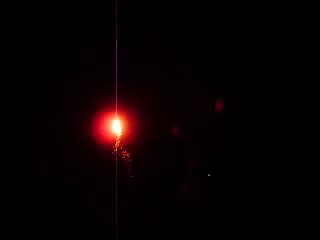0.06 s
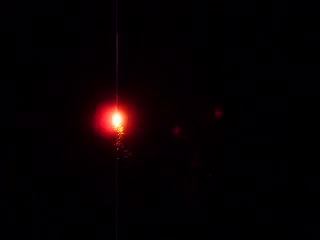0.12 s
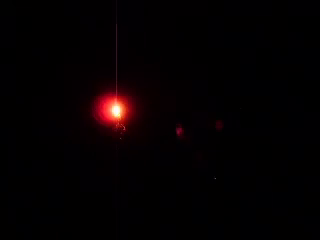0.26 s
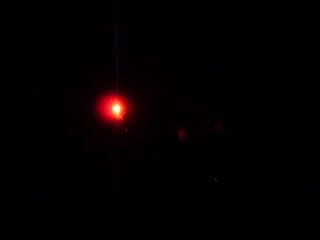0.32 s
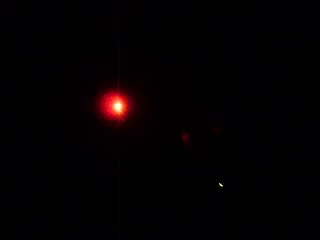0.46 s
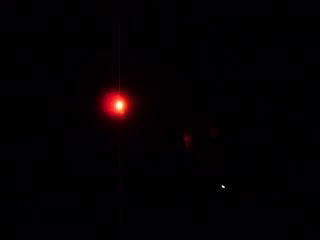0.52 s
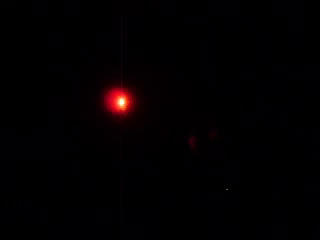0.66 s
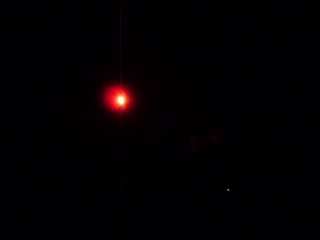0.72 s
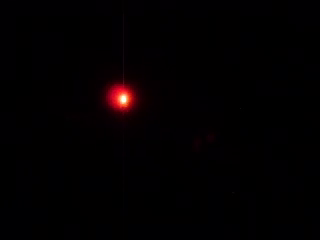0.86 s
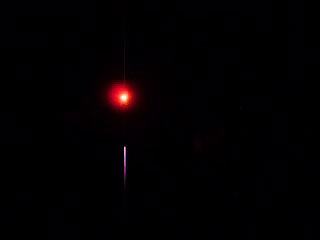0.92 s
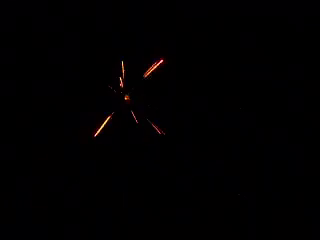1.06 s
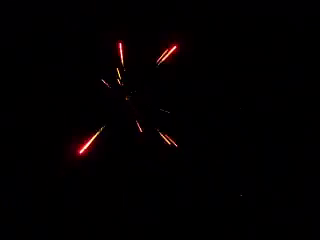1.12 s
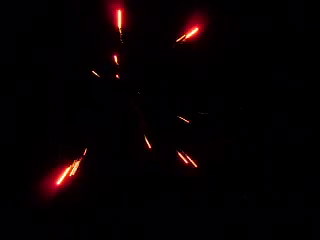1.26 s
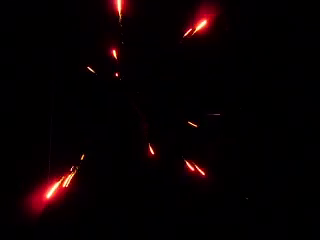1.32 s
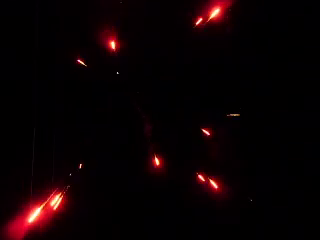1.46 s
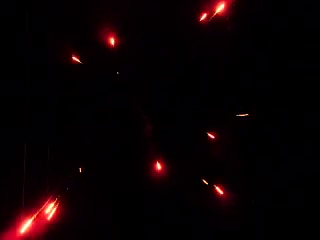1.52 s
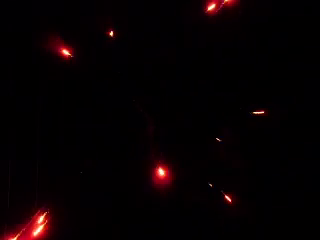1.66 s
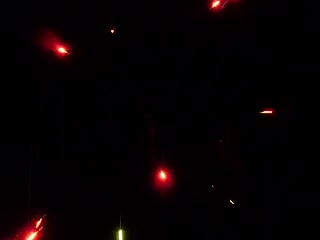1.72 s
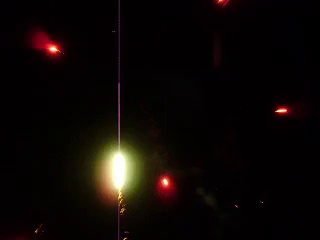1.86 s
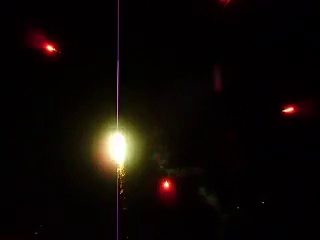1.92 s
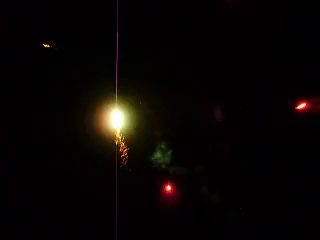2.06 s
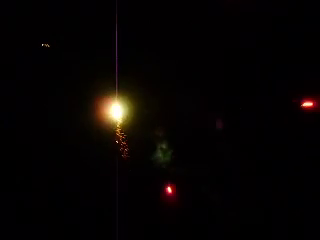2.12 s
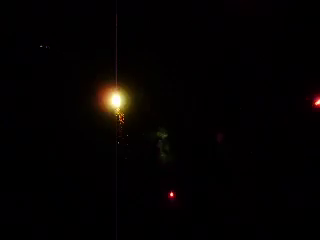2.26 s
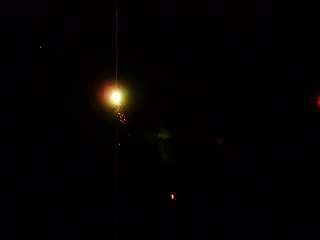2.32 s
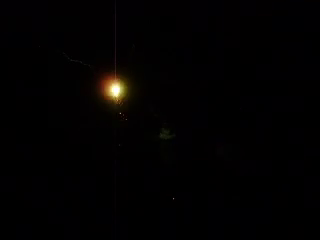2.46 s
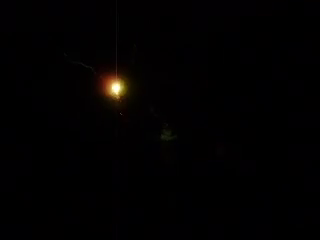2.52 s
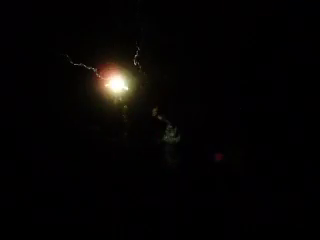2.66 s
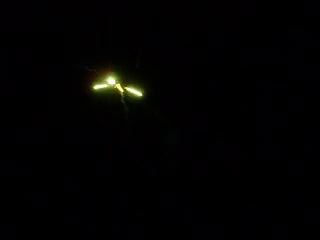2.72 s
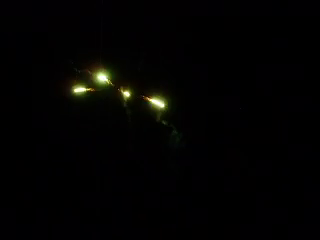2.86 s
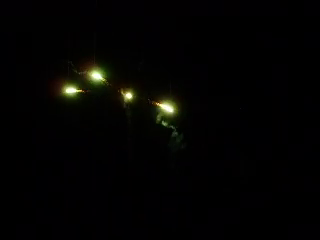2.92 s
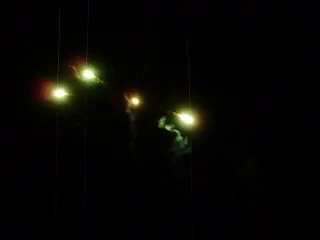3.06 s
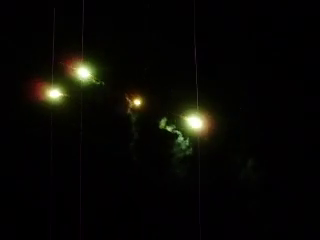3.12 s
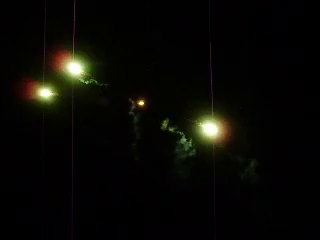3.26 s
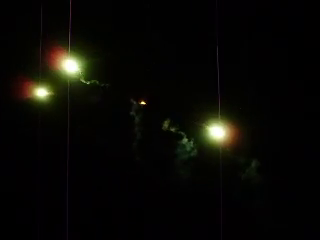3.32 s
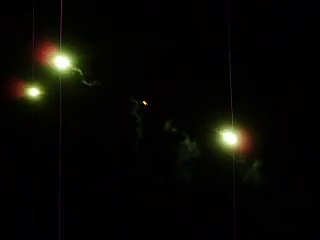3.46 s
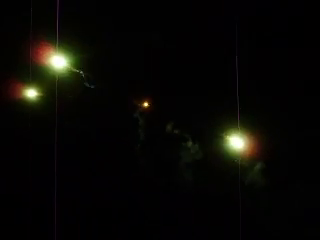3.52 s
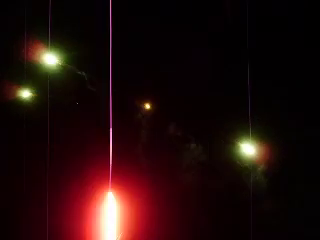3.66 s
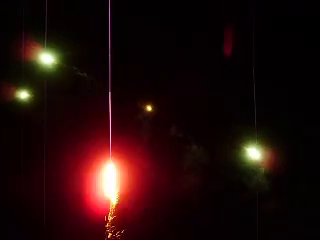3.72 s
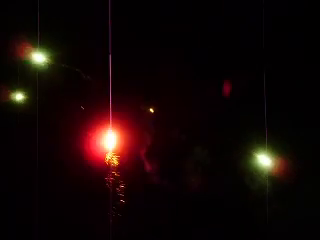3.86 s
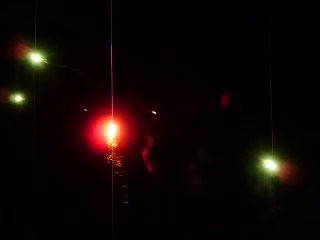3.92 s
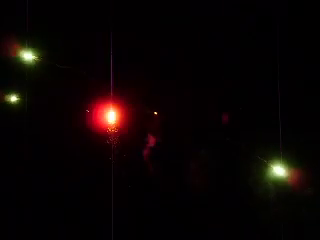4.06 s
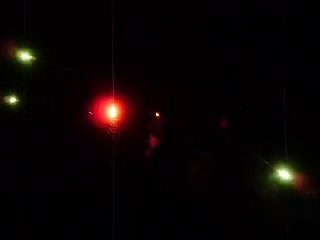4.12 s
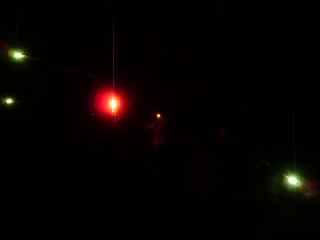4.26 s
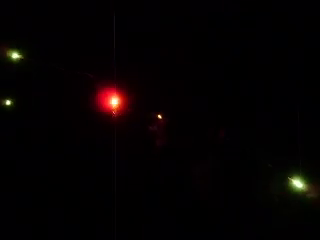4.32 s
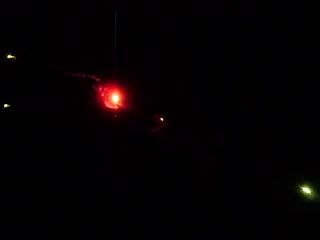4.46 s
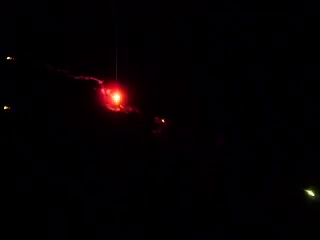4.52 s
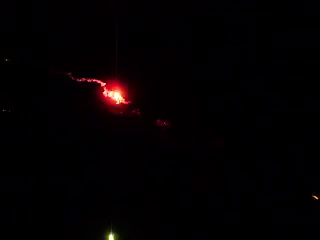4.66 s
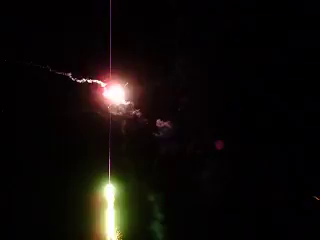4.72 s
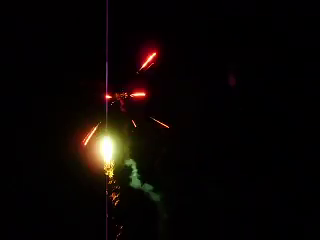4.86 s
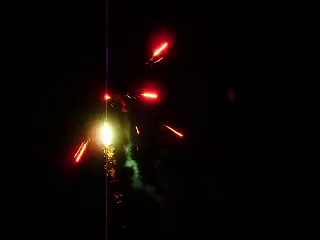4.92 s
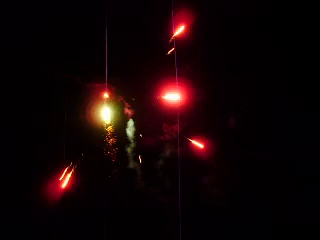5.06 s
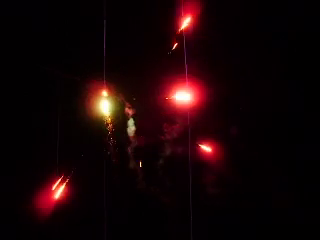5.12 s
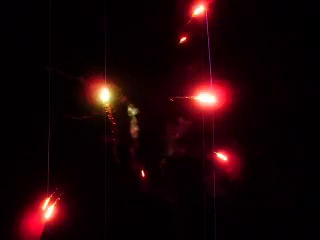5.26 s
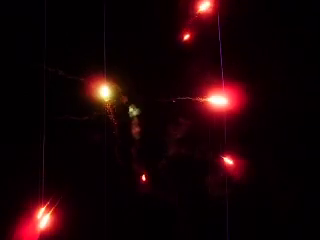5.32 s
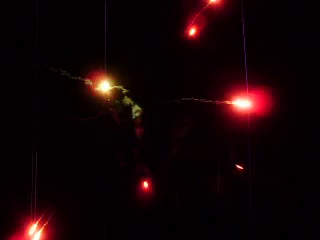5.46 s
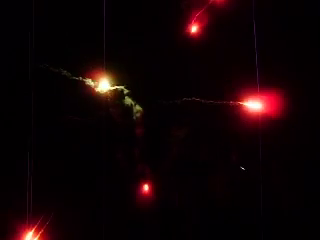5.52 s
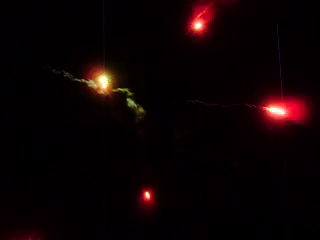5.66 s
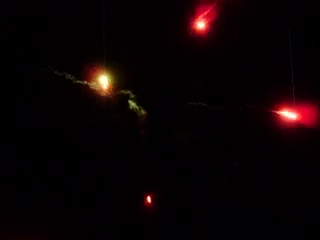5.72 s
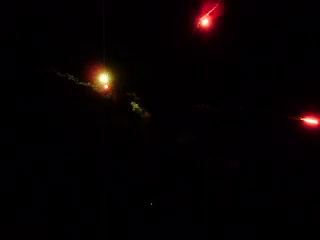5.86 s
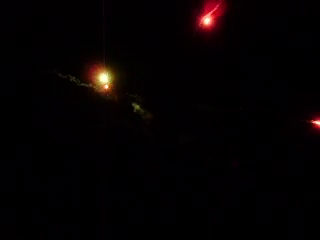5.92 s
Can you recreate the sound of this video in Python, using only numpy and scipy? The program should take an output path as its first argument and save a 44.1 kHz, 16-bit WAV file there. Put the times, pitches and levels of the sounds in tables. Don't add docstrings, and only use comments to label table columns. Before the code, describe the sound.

A night firework battery outdoors, heard through a small, band-limited microphone that overloads on every blast. It opens with low wind buffeting and a dying rush of far echoes, fading to near quiet by 1 s. A faint report at 1.1 s precedes a hard overhead burst at 1.2 s, with a sharp far report at 1.4 s and a long rough rush of echoes. A ground lift charge thuds at 1.7 s, slightly weaker, with rapid wall slaps. The second burst comes at 2.9 s, a strong report close behind at 3.0 s, then a brief falling chirp of fence reflections lies within its echoes. Full lift thuds hit at 3.5 and 4.6 s, and the third burst at 4.95 s, its rush lasting longest. Small reports dot the gaps, including 2.1, 4.4, 5.25 and 5.8 s. Low wind gusts swell throughout, strongest at 5.3 s, as echoes continue to the end.

```python
import sys
import numpy as np
from scipy import signal
from scipy.fft import rfft, irfft
from scipy.io import wavfile
from scipy.ndimage import uniform_filter1d

SR = 44100
rng = np.random.default_rng(int(sys.argv[2]) if len(sys.argv) > 2 else 0)


def elevation(decibels):
    levels = np.asarray(decibels, float)
    return 10 ** (levels / 20)


def digitize_waveform(pressure):
    field = np.atleast_2d(pressure).T
    bounded = np.clip(field, -1, 1)
    quanta = np.round(bounded * 32767).astype(np.int16)
    wavfile.write(sys.argv[1], SR, quanta)


N = 263718


def evened(x):
    return x / np.sqrt(np.mean(x ** 2) + 1e-20)


def add(mix, start_s, sound):
    part = mix[round(start_s * SR):][:len(sound)]
    part += sound[:len(part)]


def coloured(x, colour):
    hz = np.fft.rfftfreq(len(x), 1 / SR) + 1
    colour_hz, colour_db = np.transpose(colour)
    return hz, rfft(x) * elevation(np.interp(np.log(hz), np.log(colour_hz), colour_db))


def low_pass(x, hz, count):
    taps = signal.firwin(count, hz, window=("kaiser", 9), fs=SR)
    return signal.oaconvolve(x, taps[None], "same")


def blast(ms):
    u = np.arange(2000) / SR / (ms / 1000)
    return (1 - u) * np.exp(-u)


def scatter(size, per_s, spread_db):
    chance, rarity, sign = rng.random((size, 3)).T
    strength = elevation(spread_db * np.minimum(-np.log(rarity + 1e-9), 3))
    return (chance < per_s / SR) * strength * np.sign(sign - .5)


SPLIT_HZ = (260, 1150)


def echoes(taps, colour, gains):
    hz, spectrum = coloured(taps, colour)
    low, high = (1 / (1 + (hz / edge_hz) ** 6) for edge_hz in SPLIT_HZ)
    bands = (np.sqrt(low), np.sqrt(high - low), np.sqrt(1 - high))
    return sum(evened(irfft(spectrum * b, len(taps))) * g for b, g in zip(bands, gains))


# middle in seconds, level in dB, half length in seconds.
GUSTS = [
    (.12, -35.5, 0.3),
    (1.5, -33, 0.2),
    (2.5, -36.5, 0.14),
    (3.1, -38.5, 0.2),
    (4.1, -38.5, 0.68),
    (5.29, -23, 0.071),
    (5.504, -28, 0.14),
    (5.9, -32.5, .1),
]
# frequency in Hz, density in dB per Hz.
GUST_COLOUR = [(12, -32), (20, -6), (49, -6), (86, -1.5), (157, -4), (198, -7), (250, -32), (320, -44.5),
               (550, -120)]


def wind():
    calm_db, shake_db, shake_s = -50, -35.5, 0.21
    t = np.arange(N) / SR
    gusts = sum(elevation(db) ** 2 * np.exp(-((t - s) / half_s) ** 2) for s, db, half_s in GUSTS)
    since = [np.maximum(t - s, 0) / shake_s for s, _ in LIFTS]
    shakes = sum((elevation(shake_db) * u * np.exp(1 - u)) ** 2 for u in since)
    lumps = evened(uniform_filter1d(rng.standard_normal(N), 3000))
    rumble = evened(irfft(coloured(rng.standard_normal(N), GUST_COLOUR)[1], N))
    return rumble * np.sqrt(elevation(calm_db) ** 2 + gusts + shakes) * elevation(0.73 * lumps)


# start in seconds, level in dB, brightness in dB, hold in seconds, fade in dB/s.
RUSHES = [(-.02, -30, 3, 0.013, 65), (0.048, -25.5, -10.5, 0.62, 19), (0.259, -49, -1, 0.023, 67),
          (1.33, -20.5, 2, 0.44, 35), (1.956, -25, -1.5, 0.089, 27), (2.144, -22.5, -5.5, 0.077, 2),
          (3.008, -18.5, -4, 0.075, 38), (3.185, -22, -6, 0.088, 5), (3.795, -28.5, -1, 0.21, 36),
          (4.878, -33.5, 4.5, .05, 19.5), (5.054, -20.5, 2.5, 0.96, 8), (5.73, -27, -6, 0.084, 27.5),
          (5.879, -22, -6.5, 0.032, 39)]


def rush_strength():
    rise_s, boom_db = 0.0067, -28
    night_db, fade_share, air_db_per_s = (-55.5, -39.5, -50.5), (0.88, 0.88, 0.74), (19.5, 4, 15)
    t = np.arange(N) / SR
    power = elevation(np.array(night_db))[:, None] ** 2
    for s, db, bright_db, hold_s, fade in RUSHES:
        since = np.maximum(t - s, 0)
        faded_db = np.outer(fade_share, fade * np.maximum(since - hold_s, 0))
        worn_db = faded_db + np.outer(air_db_per_s, since)
        start_db = db + np.array([boom_db, 0, bright_db])
        rise = np.minimum(since / rise_s, 1)
        power = power + (t > s) * rise * elevation(start_db[:, None] - worn_db) ** 2
    return np.sqrt(power)


# frequency in Hz, density in dB per Hz.
RUSH_COLOURS = [
    [(59, -18.5), (100, -2), (187, -19.5), (263, -6.5), (690, -8.5), (1250, -23.5), (1400, -23),
     (2350, -17.5), (3900, -28), (5070, -61), (8580, -120)],
    [(59, -40.5), (100, -16), (193, -4.5), (403, 2), (734, -0.5), (1310, -16), (2910, -13), (3560, -21),
     (3900, -18), (5070, -64), (8580, -120)],
    [(59, -25), (100, -17.5), (219, -12), (341, -7.5), (391, -5.5), (982, -5.5), (1310, -14), (3010, -6),
     (3900, -14.5), (5070, -50), (8580, -120)],
    [(59, -35.5), (100, -3.5), (341, -1.5), (478, 2), (679, 1.5), (1240, -16), (2780, -15), (3560, -21.5),
     (3900, -21), (5070, -49.5), (8580, -120)],
]


def rush():
    clumps = elevation(1.5 * evened(uniform_filter1d(rng.standard_normal(N), 800)))
    taps = scatter(N, 9000, 2.1) * clumps
    gains = rush_strength()
    last_burst = np.searchsorted([b[0] for b in BURSTS], np.arange(N) / SR)
    return np.choose(last_burst, [echoes(taps, colour, gains) for colour in RUSH_COLOURS])


# start in seconds, peak in dB, length
# in ms.
THUDS = [(1.103, -16, .45), (1.388, 4.5, .3), (1.518, -9, .4), (2.142, -10, .5), (2.775, -14, .5),
         (3.026, .7, .25), (3.045, -6, .4), (3.192, -9, .2), (4.401, -13, 2.2), (5.255, -7.5, .5),
         (5.765, -7.5, .5), (5.809, -9.5, .5)]


def thuds():
    out = np.zeros(N)
    for s, db, ms in THUDS:
        hold = np.exp(-1000 / (.3 * ms * SR))
        dulled = signal.lfilter([(1 - hold) ** 2], [1, -2 * hold, hold ** 2], blast(ms))
        add(out, s, -elevation(db) * dulled / dulled.max())
    return out


def answer(groups, bands_db, release_db_per_s):
    t, power = np.arange(SR // 2) / SR, 0
    for s, length_s, db, fade, bright_db in groups:
        db_t = db - fade * np.clip(t - s, 0, length_s)
        db_t = db_t - release_db_per_s * np.maximum(t - s - length_s, 0)
        tilt_db = np.array(bands_db) + bright_db * np.array([-1, 0, 1])
        power = power + (t >= s) * elevation(db_t + tilt_db[:, None]) ** 2
    return np.sqrt(power)


def volley(shots, colours, gains, sound_back, alike, clump_db):
    size, out = SR // 2, np.zeros(N)
    shared = scatter(size, 5000, 3.6)
    clumps = elevation(clump_db * evened(uniform_filter1d(rng.standard_normal(size), 350)))
    for (s, db, *more), colour in zip(shots, colours):
        own = scatter(size, 5000, 4.0)
        taps = clumps * (alike * shared + np.sqrt(1 - alike ** 2) * own)
        add(out, s, elevation(db) * (echoes(taps, colour, gains) + sound_back(size, *more)))
    return out


# delay in seconds, slap in dB, boom in dB.
WALLS = [(.0325, 6, -14), (.041, 4, -12), (.0485, 4, -9), (.061, -24, -13), (.0715, -6, -24),
         (.076, -5, -24), (.0875, 3, -24), (.0955, -20, -10), (.117, -13, -18), (.132, -11, -12),
         (.149, -8, -22), (.183, -12, -16), (.224, -12, -22)]


def walls(size):
    out, t = np.zeros(size), np.arange(400) / SR
    slap = np.sin(2 * np.pi * 2800 * t) * np.exp(-t / .0005)
    boom = signal.lfilter([1], [1, -.9], blast(.9))
    for s, slap_db, boom_db in WALLS:
        add(out, s, elevation(slap_db) * slap)
        add(out, s, elevation(boom_db) * boom / boom.max())
    return out


def fence(size, delay_ms, db):
    out, t = np.zeros(size), np.arange(round(.027 * SR)) / SR
    uneven = evened(uniform_filter1d(rng.standard_normal((len(t), 2)), 60, axis=0)).T
    slats_hz = 1500 + 540 * np.exp(-t / .018) + 40 * uneven[0]
    phase = 2 * np.pi * np.cumsum(slats_hz) / SR
    chirp = (np.sin(phase) + .45 * np.sin(2 * phase)) * (1 + .25 * uneven[1])
    add(out, delay_ms / 1000, 1.4 * elevation(db) * chirp * signal.windows.tukey(len(t), .4))
    return out


# start in seconds, strength in dB.
LIFTS = [
    (1.6806, 1.6),
    (3.5481, 4),
    (4.629, 4),
]
# delay in seconds, length in seconds, level in dB, fade in dB/s, brightness in dB.
FROM_GROUND = [(0, .012, 6, -600, -3), (.012, .014, 14, 1600, 3), (.025, .03, -12, 400, -1),
               (.085, .05, -27, 20, -2), (.052, .13, -28, 10, 6), (.182, .075, -29, 200, 7)]
GROUND_BANDS_DB = (-2, 0, -2)
# frequency in Hz, density in dB per Hz.
GROUND_COLOUR = [(35, -71.5), (60, -20), (190, 1.5), (265, -3.5), (424, 3.5), (542, -3), (999, -4),
                 (1500, -5), (2750, 3), (3900, -0.5), (5070, -79), (8580, -120)]


def lifts():
    gains = answer(FROM_GROUND, GROUND_BANDS_DB, release_db_per_s=2500)
    return volley(LIFTS, [GROUND_COLOUR] * len(LIFTS), gains, walls, alike=0.974, clump_db=2.0)


# start in seconds, strength in dB, fence delay in ms, fence level in dB.
BURSTS = [
    (1.2217, .6, 86, -14),
    (2.875, -.6, 77, -9.5),
    (4.9547, -1.2, 78, -9.5),
]
# delay in seconds, length in seconds, level in dB, fade in dB/s, brightness in dB.
FROM_SKY = [(0, .0045, 12, 1300, 0), (.0112, .01, 9, 750, -1), (.022, .04, 1.5, 350, 0),
            (.05, .035, -11, 10, 1), (.08, .045, -10, 10, 3), (.122, .06, -17, 250, 1.5)]
SKY_BANDS_DB = (-14, 2, -6.5)


def bursts():
    gains = answer(FROM_SKY, SKY_BANDS_DB, release_db_per_s=5000)
    return volley(BURSTS, RUSH_COLOURS[1:], gains, fence, alike=0.7, clump_db=1.2)


def scene():
    return (wind() + rush() + thuds() + lifts() + bursts())[None]


def band_limit(x):
    return signal.sosfilt(signal.butter(12, 16660, fs=SR, output="sos"), x)


def record(dry):
    converter_hz, input_hz, mic_hz, edge_hz = 8000, 3985, 3900, 15900
    converter_top, output_top, offset = .708, .714, -.006
    sampled = low_pass(np.clip(dry, -converter_top, converter_top), input_hz, count=301)
    carrier = np.cos(2 * np.pi * converter_hz * np.arange(N) / SR)
    mirrored = sampled * (1 + 2 * carrier)
    smoothed = low_pass(mirrored, mic_hz, count=171)
    trimmed = np.clip(smoothed, -output_top, output_top)
    return band_limit(low_pass(trimmed, edge_hz, count=151) + offset)


dry = scene()
out = record(dry)
digitize_waveform(out)
```